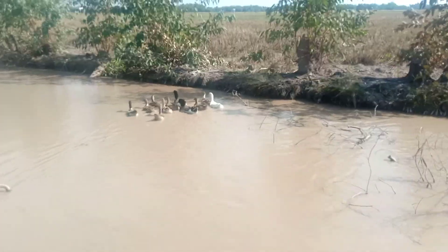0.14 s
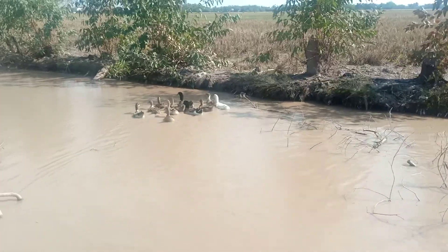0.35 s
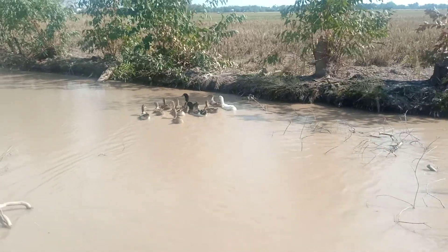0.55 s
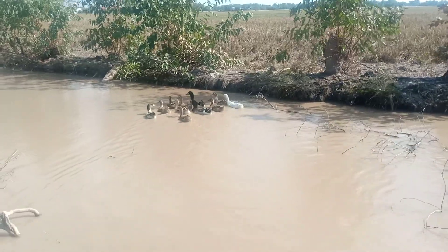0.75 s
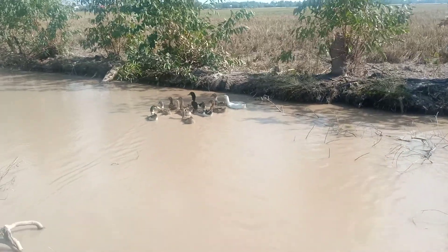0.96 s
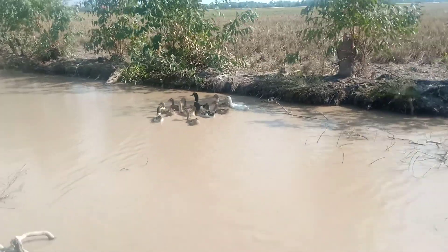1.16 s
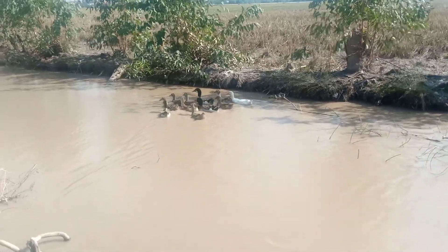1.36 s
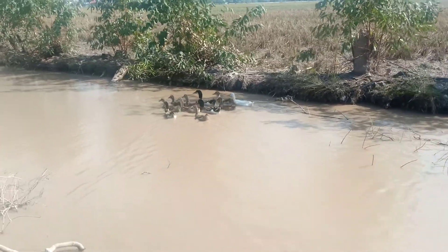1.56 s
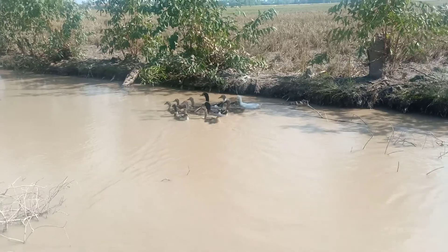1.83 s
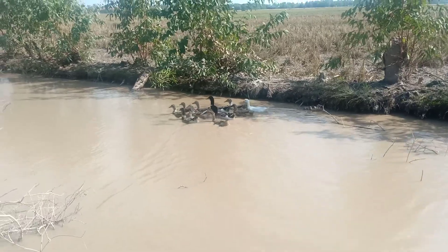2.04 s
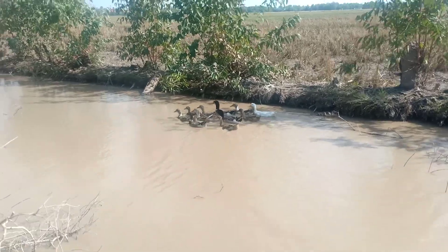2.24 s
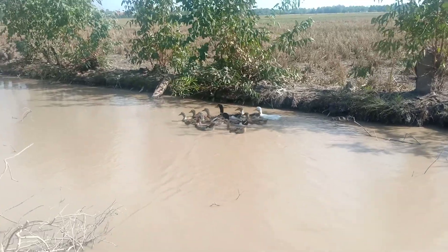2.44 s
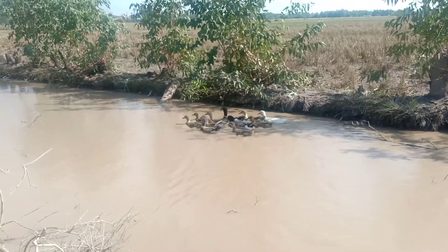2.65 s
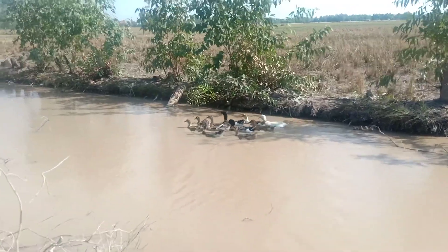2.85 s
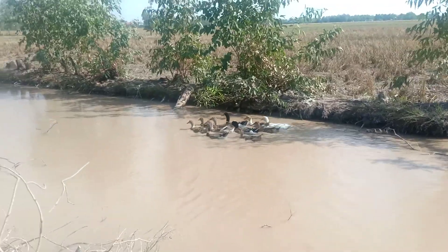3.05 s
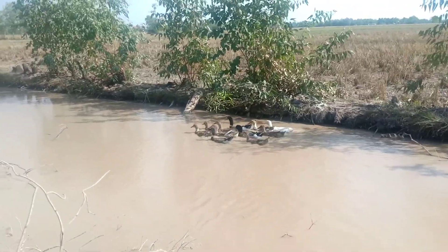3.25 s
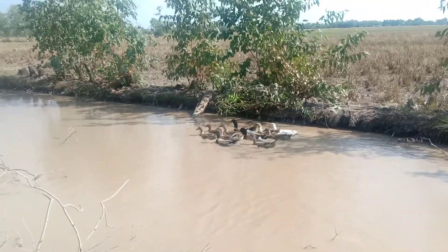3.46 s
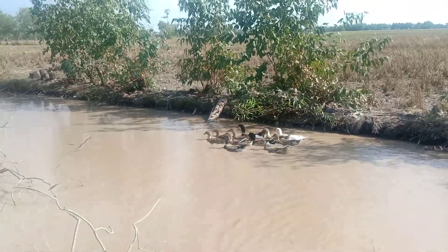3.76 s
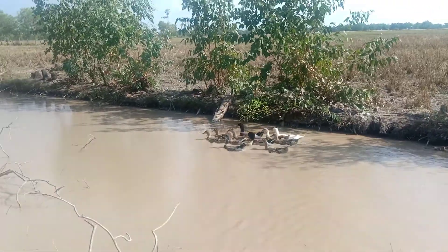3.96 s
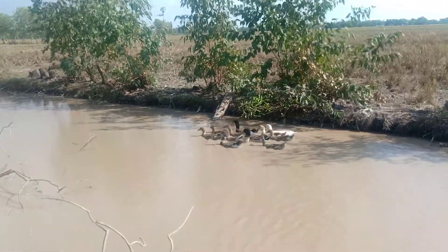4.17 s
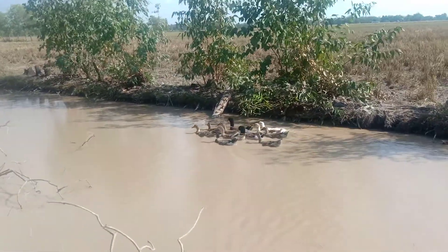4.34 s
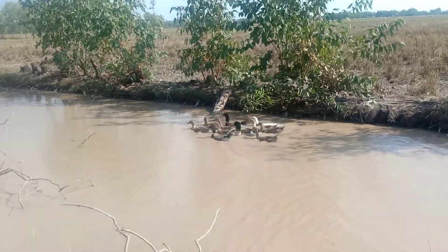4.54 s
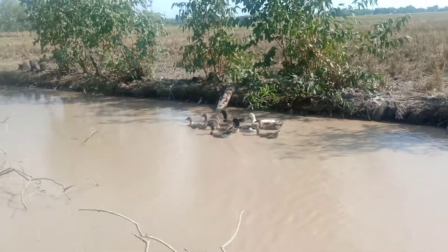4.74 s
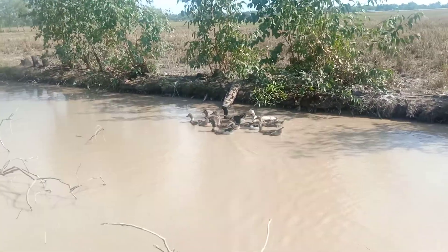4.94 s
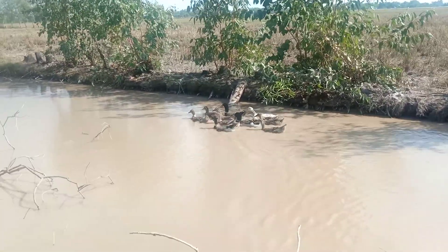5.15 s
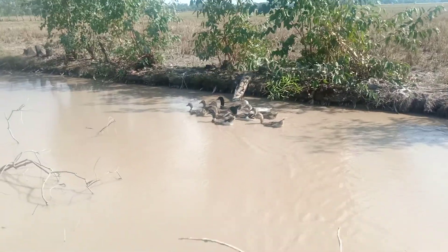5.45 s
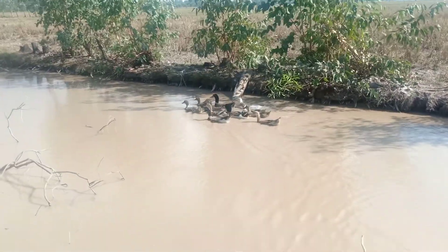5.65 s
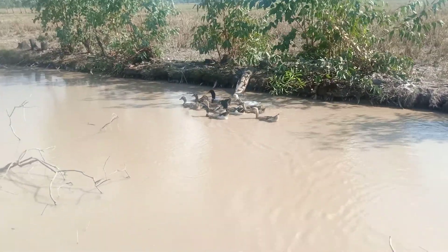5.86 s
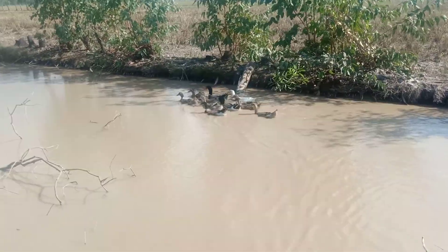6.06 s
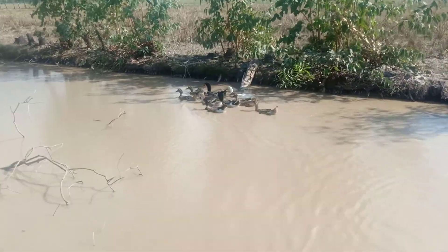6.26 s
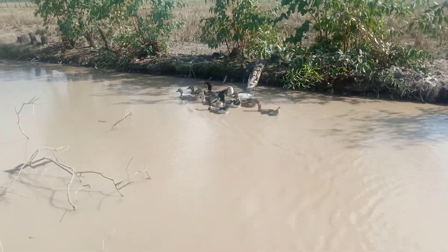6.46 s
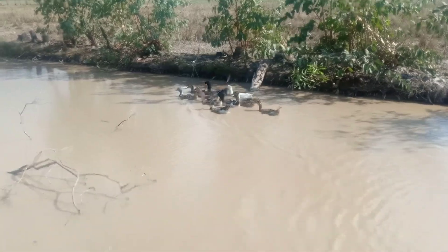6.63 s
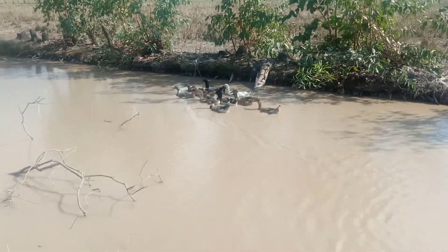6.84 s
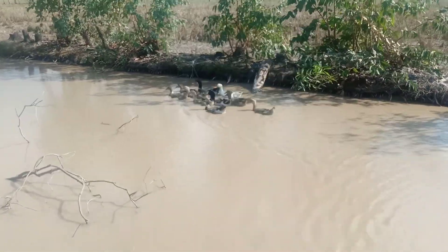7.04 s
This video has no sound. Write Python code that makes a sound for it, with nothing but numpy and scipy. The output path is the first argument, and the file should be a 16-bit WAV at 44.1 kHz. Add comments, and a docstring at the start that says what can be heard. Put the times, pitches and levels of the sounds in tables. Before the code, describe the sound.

Ducks chatter outdoors in short quacks and raspy calls, with a faint songbird and low wind thumps.

```python
"""A canal in open country, where a small flock of ducks chatters some way from a hand-held phone.
Each call is a source and a filter: membranes in the syrinx slap, and the throat and bill resonate.
Drakes rasp in slow noisy pulses, hens cluck in short dark bursts, and far birds fill the gaps.
A songbird trills, the ducks splash, the banks echo and small ticks sound close by. Wind rumbles and
thumps on the two microphone ports, over a faint hum and the hiss of leaves."""
import sys
import numpy as np
from scipy import signal
from scipy.fft import rfft, irfft
from scipy.io import wavfile
from scipy.ndimage import uniform_filter1d, map_coordinates

SR = 44100
rng = np.random.default_rng(int(sys.argv[2]) if len(sys.argv) > 2 else 0)


def persist_wave(psi):
    """Save psi, clipped to +-1, as 16-bit WAV."""
    counts = np.round(np.clip(psi, -1, 1) * 32767).astype(np.int16)
    wavfile.write(sys.argv[1], SR, np.atleast_2d(counts).T)


N = 370440


def flock():
    """Superposition: the calls and splashes of the near birds add, each at its own time."""
    # short rasps, except the row at 4.874 s, a dull burst voiced the same way that sounds with a splash, and
    # the row at 5.779 s, a brief pulse near 2 kHz voiced the same way among a run of slaps: # middle_s,
    # throat_db, length_s, centre_hz, bill_re_throat_db
    quacks = [(.205, -49.5, 0.06, 1880, -15.5), (.446, -50.5, 0.076, 1890, -13),
              (.645, -48, 0.058, 2060, -3), (.715, -49.5, 0.04, 1820, -12.5), (.807, -52, 0.12, 2180, -8.5),
              (.916, -47.5, 0.049, 1860, -11.5), (1.448, -52.5, 0.057, 1570, -19),
              (2.027, -51.5, 0.048, 1780, -17), (2.312, -52.5, 0.039, 1840, -32),
              (3.013, -49, 0.08, 2070, -16.5), (3.139, -52, 0.067, 1730, -12.5),
              (3.697, -54, 0.064, 2070, -10.5), (3.964, -50, 0.077, 2360, -11),
              (4.071, -48, 0.06, 1820, -15), (4.664, -49.5, 0.035, 1940, -11.5),
              (4.874, -48.5, 0.066, 2030, -14), (4.967, -49, 0.072, 1830, -13),
              (5.092, -47, 0.044, 1980, -2.5), (5.293, -50, 0.067, 1880, 1.5),
              (5.568, -50, 0.052, 1830, -4.5), (5.675, -47, 0.062, 1770, -5),
              (5.779, -46.5, 0.034, 1940, -13), (5.87, -44.5, 0.063, 2000, 1.5),
              (6.055, -43.5, 0.065, 1600, -10.5), (6.2, -41, 0.058, 1540, -11.5),
              (6.296, -45, 0.063, 1720, -4), (6.406, -42.5, 0.053, 1920, 3),
              (6.578, -50.5, 0.047, 1830, -10.5), (6.722, -46, 0.08, 1860, -4.5),
              (6.783, -45, 0.043, 1860, -7), (6.935, -42, 0.054, 1940, 1), (7.269, -44, 0.05, 1930, -2.5),
              (7.474, -41, 0.063, 2040, 3.5), (7.577, -51, 0.059, 2440, -9), (7.72, -50.5, 0.056, 1950, -6),
              (7.79, -44.5, 0.059, 1970, 0.5), (7.998, -43, 0.038, 2050, 5),
              (8.199, -44.5, 0.053, 2050, -10), (8.345, -46, 0.051, 2020, -1)]
    # hens' calls: middle_s, level_db, length_s, pulse_hz
    clucks = [(.382, -44.5, 0.054, 226), (.956, -55, 0.041, 148), (1.281, -45.5, 0.055, 196),
              (1.936, -41.5, 0.055, 240), (2.414, -55, 0.05, 130), (2.611, -44.5, 0.028, 153),
              (2.888, -54, 0.016, 130), (3.064, -49.5, 0.037, 132), (3.171, -53, 0.029, 92),
              (3.309, -51, 0.038, 127), (3.595, -52.5, 0.03, 120), (3.748, -50.5, 0.047, 90),
              (3.921, -48, 0.034, 94), (4.038, -48.5, .032, 144), (4.178, -52, 0.031, 118),
              (4.273, -52.5, 0.043, 87), (4.417, -54, 0.075, 140), (4.538, -51.5, 0.048, 105),
              (4.731, -49, 0.063, 103), (4.827, -47.5, 0.032, 125), (4.9675, -46.5, 0.043, 105),
              (5.104, -51, 0.045, 92), (5.418, -51, 0.052, 127), (5.675, -45, 0.045, 112),
              (5.792, -50.5, 0.058, 91), (5.8305, -40, 0.0095, 55), (5.927, -48, 0.055, 109),
              (6.039, -49, 0.032, 156), (6.19, -45, 0.033, 136), (6.313, -43.5, 0.049, 206),
              (6.474, -48, 0.075, 175), (6.556, -53, 0.064, 200), (6.634, -51.5, 0.024, 97),
              (6.959, -42, 0.022, 196), (7.158, -50, 0.044, 138), (7.2335, -44.5, 0.033, 108),
              (7.393, -44.5, 0.026, 136), (7.538, -48, 0.039, 166), (7.679, -44, 0.039, 117),
              (7.861, -48.5, 0.047, 59), (7.996, -51, 0.092, 150), (8.117, -46.5, 0.024, 118),
              (8.342, -46, 0.025, 336)]
    # long rasps: start_s, shuts_s, end_s, throat_db, first_bill_db, widest_bill_db,
    # widest_centre_hz, crest_share, first_pulse_hz, last_pulse_hz
    rasps = [(1.58, 1.9, 1.97, -47, -29, -8, 1650, 0.71, 73, 88),
             (2.45, 2.78, 2.86, -39.5, -25, 2, 1900, 0.37, 87, 108.4),
             (3.31, 3.65, 3.77, -42, -16, 3, 2110, .4, 88, 99),
             (4.24, 4.56, 4.6, -39, -10.5, 10.5, 2540, 0.82, 74.3, 112)]
    # bursts of spray: middle_s, level_db, length_s
    splashes = [(3.875, -44.5, 0.065), (4.89, -43.5, .03)]
    # high call: middle_s, level_db, length_s, pulse_hz, resonance_hz
    yelps = [(6.2198, -36.5, 0.049, 155, 2480)]
    out = np.zeros(N)
    for rows, source in (quacks, quack), (clucks, cluck), (rasps, rasp), (splashes, splash), (yelps, yelp):
        for row in rows:
            add(out, *source(*row))
    return out


def syrinx(pulse_hz, jitter, shimmer_db, puff, puff_s):
    """Pulsed source: membranes slap unevenly, and each slap releases a puff of air noise."""
    wobble, strength, air = rng.standard_normal((len(pulse_hz), 3)).T
    cycles = np.cumsum(pulse_hz * (1 + jitter * unit_rms(uniform_filter1d(wobble, size=300)))) / SR
    cycles -= cycles[len(cycles) // 2]  # one slap falls at the very middle
    onsets = np.diff(np.floor(cycles), append=np.floor(cycles[-1])) > 0
    slaps = onsets * gain_of(shimmer_db * strength)
    pole = np.exp(-1 / (puff_s * SR))
    puffs = air * signal.lfilter([1], np.poly([pole] * 3), slaps)
    return unit_rms(slaps + 1e-9 * air) + puff * unit_rms(puffs + 1e-9 * air)


def drake(throat_db, bill_db, centre_hz, pulse_hz, tuning):
    """Source and filter: throat modes near the centre ring most; an open bill adds air and hiss."""
    # throat modes, bill shut and open: shut_hz, open_hz, width_hz, shut_db, open_db
    throat_modes = [(1290, 1410, 110, -4, -2), (1630, 1630, 90, 0, 1.5), (1960, 1960, 80, 0, -7),
                    (2400, 2230, 100, -1, -3.5), (2700, 2740, 170, -9, -2), (2980, 3000, 170, -12, -2)]
    # bill modes: pitch_hz, width_hz, level_db
    bill_modes = [(3560, 150, -8), (4170, 280, -2), (4660, 300, 0), (5000, 240, 5), (5420, 300, -7),
                  (5950, 250, -10)]
    count, wander_db, wander_share = len(pulse_hz), 2.2, .01
    opening = 1 / (0.5 + np.exp(-(bill_db + 15) / 2.9))  # 0 shut, 2 wide open
    air = np.array([.6 + .5 * opening, 1.2 + .9 * opening])  # the bill gets more than the throat
    drive, breathy = syrinx(pulse_hz, jitter=.03, shimmer_db=2.2, puff=air, puff_s=.001)
    weights, modes = [], []
    for shut_hz, open_hz, width_hz, shut_db, open_db in throat_modes:
        hz = tuning * (shut_hz + (open_hz - shut_hz) * opening / 2)
        db = shut_db + (open_db - shut_db) * opening + wander_db * wander(count)
        nearness = np.exp(-.5 * ((centre_hz - hz) / 420) ** 2) + 0.17
        weights.append(gain_of(db) * nearness)
        modes.append(ring(drive, hz, width_hz))
    throat = np.sum(np.multiply(weights, modes), axis=0) / np.linalg.norm(weights, axis=0)
    bill_tuning = rng.uniform(.985, 1.01) * tuning ** 0.12  # bills differ, and partly follow the throat
    bill = np.zeros(count)
    for hz, width_hz, db in bill_modes:
        gain = gain_of(db + wander_db * wander(count))
        bill += gain * ring(breathy, hz * bill_tuning * (1 + wander_share * wander(count)), width_hz)
    return gain_of(throat_db) * (throat + gain_of(bill_db) * unit_rms(bill))


def rasp(start_s, shuts_s, end_s, level_db, first_db, widest_db, widest_hz, crest, first_hz, last_hz):
    """Time-varying filter: the bill opens, the throat brightens and weakens, then the bill snaps shut."""
    attack_s, release_s, snap_s = 0.067, 0.1, 0.012
    shut_hz, shut_db, hollow_db, edge_db = 1620, -19, -7, -9.5
    t = np.arange(start_s, end_s, 1 / SR)
    progress = np.clip((t - start_s) / (shuts_s - start_s), 0, 1)
    opened = progress ** 0.6  # the bill opens ever more slowly
    shut = np.clip((t - shuts_s) / snap_s, 0, 1)
    gape = opened * (1 - shut)
    bill_db = (first_db + (widest_db - first_db) * opened) * (1 - shut) + shut_db * shut
    edge = np.clip(np.maximum(1 - (t - start_s) / attack_s, 1 - (end_s - t) / release_s), 0, 1)
    throat_db = level_db + hollow_db * gape + edge_db * edge
    # the throat's pitch rises and sinks with the neck, peaking at the share `crest` of the call
    skewed = ((t - start_s) / (end_s - start_s)) ** (np.log(.5) / np.log(crest))
    tuning = 0.89 + 0.11 * np.sqrt(np.abs(np.sin(np.pi * skewed)))
    pulse_hz = first_hz + (last_hz - first_hz) * progress
    call = drake(throat_db, bill_db, shut_hz + (widest_hz - shut_hz) * gape, pulse_hz, tuning)
    return start_s, call * signal.windows.tukey(len(t), .06)


def quack(middle_s, level_db, length_s, centre_hz, bill_db, tuning=None):
    """Formant glide: a short rasp climbs in and sags after; harder ones pulse faster and start dark."""
    # the calls pass to a bird with a lower throat: time_s, pitch_ratio
    throat_tuning = [(0, 0.96), (5.5, 0.95), (5.85, 0.92), (6.45, 0.93), (6.75, 0.92), (7.3, 0.95),
                     (8.4, 0.91)]
    tuning = tuning or np.interp(middle_s, *np.transpose(throat_tuning))
    climb, sag = .009, .004
    shape_db = swell(length_s, skirt=1.1)
    effort = np.clip((bill_db + 13) / 12, 0, 1)
    rising = np.arange(len(shape_db)) < len(shape_db) / 2
    below_db = np.maximum(shape_db, -16)
    bend = np.where(rising, climb, sag) * (0.11 + effort) * below_db
    lead = .7 * effort * rising  # in hard calls the throat sounds ahead of the bill
    darkening_hz = 50 * effort * rising * below_db
    pulse_hz = np.full_like(shape_db, 69 + 18 * effort)
    call = drake(level_db + (1 - lead) * shape_db, bill_db + (0.35 + lead) * shape_db,
                 centre_hz + darkening_hz, pulse_hz, tuning + bend)
    return centred(middle_s, call)


def cluck(middle_s, level_db, length_s, pulse_hz):
    """Impulse excitation: a few slaps ring a hen's dark throat, each with a bright edge."""
    # the timbre drifts as the hens mill about: time_s, formant_hz, upper_lift_db, edge_db
    colour = [(.4, 710, 12, -17), (1.95, 750, 14.5, -22), (2.6, 770, 10.5, -15), (4.1, 820, -4, -16.5),
              (4.95, 780, -4, -10), (5.4, 780, 3, -9.5), (5.8, 855, 9.5, -12.5), (6.3, 910, 9, -12),
              (7.4, 825, 9.5, -15), (8.1, 815, 9.5, -8.5), (8.35, 860, 5, -10)]
    # throat modes: formant_ratio, nominal_width_hz, level_db
    throat_modes = [(0.3, 172, 6), (0.602, 183, 11), (1.018, 133, 12.5), (1.55, 111, 2.5),
                    (2.03, 150, -2.5)]
    times_s, *columns = np.transpose(colour)
    formant_hz, lift_db, edge_db = (np.interp(middle_s, times_s, column) for column in columns)
    formant_hz *= rng.uniform(.92, 1.08)  # no two hens alike
    shape_db = 2.1 * swell(length_s, skirt=.9, steep=5.4)
    hoarseness = 1500 * length_s / pulse_hz  # long slow clucks carry more air
    slaps = syrinx(np.full_like(shape_db, pulse_hz), .06, shimmer_db=2.2, puff=hoarseness, puff_s=.0007)
    drive = gain_of(shape_db) * slaps
    throat = sum(gain_of(db + lift_db * (ratio > 1.2)) * ring(drive, ratio * formant_hz, 1.32 * width)
                 for ratio, width, db in throat_modes)
    throat = signal.sosfilt(signal.butter(2, 2.6 * formant_hz, fs=SR, output="sos"), unit_rms(throat))
    edge = ring(drive, 2540, 470) + ring(drive, 3840, 480) + 0.88 * ring(drive, 4930, 1000)
    return centred(middle_s, gain_of(level_db) * (throat + gain_of(edge_db) * edge))


def yelp(middle_s, level_db, length_s, pulse_hz, resonance_hz):
    """Single formant: quick clean slaps ring one high resonance."""
    shape_db = swell(length_s, skirt=0.61, steep=1.4)
    drive = syrinx(np.full_like(shape_db, pulse_hz), jitter=.05, shimmer_db=2, puff=.4, puff_s=.001)
    return centred(middle_s, gain_of(level_db + shape_db) * ring(drive, resonance_hz, 700))


def splash(middle_s, level_db, length_s):
    """Amplitude-modulated noise: drops make a burst of spray gritty, strongest in the upper middle."""
    shape_db = swell(length_s, skirt=0.99, steep=0.76)
    air, drops = rng.standard_normal((len(shape_db), 2)).T
    spray = air * gain_of(5.2 * unit_rms(uniform_filter1d(drops, size=60)))
    return centred(middle_s, gain_of(level_db + shape_db) * ring(spray, 2270, 2250))


def songbird_and_bubble():
    """Frequency sweeps: a trill of falling notes, a few chirps, and one bubble that rises in pitch."""
    # loudness of the trill: time_s, level_db
    trill = [(1.1, -85), (1.7, -58), (2, -54), (2.5, -55)]
    # two chirps, an arched chirp in two slides, then one rising bubble in two slides:
    # start_s, level_db, from_hz, to_hz, length_s
    slides = [(0.591, -49, 4800, 5760, 0.041), (0.638, -47.5, 5660, 4600, 0.03),
              (3.262, -50, 3680, 4500, 0.013), (3.272, -52, 4500, 3700, 0.013),
              (5.464, -38, 777, 980, 0.023), (5.488, -45.5, 1030, 1320, 0.025)]
    out = np.zeros(N)
    for start_s in np.arange(1.128, 2.48, .0656):
        level_db = np.interp(start_s, *np.transpose(trill))
        add(out, start_s, gain_of(level_db) * glide(2500, 2280, 0.04, rise=0.56))
    for start_s, level_db, *sweep in slides:
        add(out, start_s, gain_of(level_db) * glide(*sweep, rise=0.33))
    return out


def far_birds():
    """Incoherent sum: eighty short rasps at random times merge into a murmur."""
    # loudness of the murmur: time_s, level_db
    murmur = [(0, -58), (.9, -58), (2, -97), (4, -53), (5.3, -58.5), (8.4, -61.5)]
    out = np.zeros(N)
    for when, faintness, length, tone, build in rng.random((80, 5)):
        add(out, *quack(when * N / SR, level_db=-4 * faintness, length_s=.035 + .03 * length,
                        centre_hz=1300 + 1300 * tone, bill_db=-24 + 10 * tone, tuning=0.9 + 0.302 * build))
    return gain_of(along(murmur)) * unit_rms(out)


def ticks():
    """Broadband transients: a brief burst of noise rings a bright snap and a duller knock."""
    # clicks near the microphones: start_s, snap_db
    clicks = [(.309, -54), (0.71, -57), (0.7233, -50), (1.171, -53.5), (4.795, -64), (4.839, -55.5),
              (4.941, -52), (5.039, -66), (5.128, -63), (5.236, -58), (5.621, -64), (6.159, -66),
              (6.202, -54), (7.2668, -53), (8.313, -57.5)]
    knock_db = 9
    out, t = np.zeros((2, N)), np.arange(400) / SR
    for start_s, snap_db in clicks:
        for channel in out:
            grit = rng.standard_normal(len(t)) * t * np.exp(-t / 0.00091)
            click = ring(grit, 23000, 7100) + gain_of(knock_db) * ring(grit, 2770, 2330)
            add(channel, start_s, gain_of(snap_db) * click)
    return out


def wind():
    """Turbulent pressure on the ports: a lumpy rumble that follows the gusts, and low thumps."""
    # strength of the gusts: time_s, level_db
    gusts = [(0, -51.5), (.5, -57.5), (5.5, -48.5), (5.75, -41.5), (6.2, -49), (7.7, -49), (8.2, -47.5)]
    # spectrum of the rumble: frequency_hz, relative_db
    spectrum = [(20, -66), (48, -2), (100, 1.5), (180, -7.5), (300, -23), (600, -26), (1200, -79)]
    # buffets of air: time_s, level_db
    thumps = [(0.446, -50.5), (3.574, -52), (5.689, -41), (5.724, -42.5), (6.958, -49), (7.098, -37),
              (7.383, -46.5), (7.983, -40.5), (8.229, -45), (8.29, -42.5)]
    out = gain_of(along(gusts)) * noise(spectrum, coherence=.4, patchy_db=2.2, frame=1024)
    t = np.arange(round(.1 * SR)) / SR
    for time_s, level_db in thumps:
        pitch_hz = 265 + 3.5 * level_db  # harder thumps sound higher
        for channel in out:
            puff = rng.standard_normal(len(t)) * t * np.exp(-t / 0.012)
            add(channel, time_s - .01, gain_of(level_db) * ring(puff, pitch_hz, 136))
    return out


def hum():
    """Slow random modulation: two low tones from afar waver together in pitch and level."""
    # partials of the hum: pitch_hz, rms_db
    partials = [(59.3, -59), (118.5, -61)]
    drift = unit_rms(uniform_filter1d(rng.standard_normal(N), size=9000))
    warped_s = np.cumsum(1 + 0.01054 * drift) / SR
    waver = uniform_filter1d(rng.standard_normal(N), size=4000)
    waver_db = 2.5 * unit_rms(uniform_filter1d(waver, size=4000))
    return np.sqrt(2) * sum(gain_of(db + waver_db) * np.sin(2 * np.pi * hz * warped_s)
                            for hz, db in partials)


def countryside():
    """Ambient noise: a steady wash, and a faint hiss of leaves that swells into short rustles."""
    # spectrum of the open country: frequency_hz, relative_db
    wash_spectrum = [(120, -36), (200, 4), (346, -4), (644, 2), (1000, -1.5), (1500, -8), (1950, -8),
                     (2400, -5), (2850, -6), (3390, -23), (5160, -13), (7580, -34), (13600, -33.5),
                     (15700, -62)]
    # spectrum of the leaves: frequency_hz, relative_db
    leaf_spectrum = [(4000, 5), (7000, -10), (9500, -22), (11500, -14.5), (13800, -12.5), (15800, -13)]
    # rustles of leaves and splashes: middle_s, level_db
    rustles = [(.03, -56), (3.88, -57), (4.87, -48), (5.79, -57.5), (6.3, -52), (7.1, -52.5), (7.58, -54),
               (7.88, -58), (8.28, -47.5)]
    wash = gain_of(-55.5) * noise(wash_spectrum, coherence=0.51, patchy_db=2.6, frame=512)
    t = np.arange(N) / SR
    crackle = gain_of(4.5 * unit_rms(uniform_filter1d(rng.standard_normal(N), size=80)) - 3)
    swells = sum(gain_of(db - 6.1 * ((t - middle_s) / 0.044) ** 2) for middle_s, db in rustles)
    leaves = noise(leaf_spectrum, coherence=0.024, patchy_db=4.5, frame=256)
    return wash + (gain_of(-62.5) + crackle * swells) * leaves


def ports(x):
    """Time and level differences: sound reaches one port first, and the phone's body shades one."""
    # delay of the left port as the phone turns: time_s, lag_samples
    lag = [(0, -1.5), (1.2, -3), (1.6, 1.5), (4, 2), (6.5, 3), (8.4, 1.5)]
    # acoustic shadow: frequency_hz, left_over_right_db
    shadow = [(300, 0.5), (800, -1), (1500, 0.2), (2400, 5.5), (4400, 5.5), (9000, 2)]
    left = map_coordinates(x, [np.arange(N) - along(lag)], order=3)
    half_db = spectrum_at(shadow, np.fft.rfftfreq(N, 1 / SR)) / 2
    return irfft(rfft([left, x]) * gain_of([half_db, -half_db]), N)


def banks(x):
    """Reverberation: sparse echoes off the water, the bank and the trees decay exponentially."""
    rt60_s = 0.1
    t = np.arange(round(.3 * SR)) / SR
    signs = rng.choice([-1., 1.], (2, len(t)))
    arrivals = (rng.random((2, len(t))) < .04) * (t > .002)
    echoes = signs * arrivals * gain_of(-60 * t / rt60_s)
    return signal.oaconvolve(x[None], echoes / np.linalg.norm(echoes[0]), axes=1)[:, :N]


def ring(x, hz, width_hz):
    """Resonance by heterodyning: shift a fixed or moving pitch to zero, smooth, shift back; rms 1."""
    carrier = np.exp(2j * np.pi * np.cumsum(hz * np.ones(len(x))) / SR)
    pole = np.exp(-np.pi * width_hz * np.sqrt(2) / SR)
    return unit_rms((carrier * signal.lfilter([1], np.poly([pole, pole]), x / carrier)).real)


def noise(spectrum, coherence, patchy_db, frame):
    """Spectral shaping: two partly coherent channels of coloured noise with drifting patches; rms 1."""
    frames, hz = 4 * N // frame + 5, np.fft.rfftfreq(frame, 1 / SR)
    real, imag, other_real, other_imag, patches = rng.standard_normal((frames, len(hz), 5)).T
    patches = unit_rms(uniform_filter1d(uniform_filter1d(patches, size=8, axis=0), size=10, axis=1))
    left = real + 1j * imag
    right = coherence * left + np.sqrt(1 - coherence ** 2) * (other_real + 1j * other_imag)
    bins = np.array([left, right]) * gain_of(spectrum_at(spectrum, hz)[:, None] + patchy_db * patches)
    return unit_rms(signal.istft(bins, nperseg=frame, noverlap=frame * 3 // 4)[1][:, :N])


def glide(from_hz, to_hz, length_s, rise):
    """Linear chirp: a short sliding tone; a smaller rise sharpens its attack."""
    progress = np.arange(0, 1, 1 / (length_s * SR))
    hz = from_hz + (to_hz - from_hz) * progress
    return np.sin(2 * np.pi * np.cumsum(hz) / SR) * np.sin(np.pi * progress ** rise) ** 2


def wander(count):
    """Modulation by the moving head and bill: three random sines of 2 to 11 Hz, rms about 1."""
    speed, phase = rng.random((3, 2)).T
    cycles = (2 + 9 * speed) * np.arange(count)[:, None] / SR + phase
    return .8 * np.sin(2 * np.pi * cycles).sum(axis=1)


def swell(length_s, skirt, steep=2.03):
    """Envelope in dB, 6 down at either end of the length and reaching skirt lengths each way."""
    t = np.arange(-skirt * length_s, skirt * length_s, 1 / SR)
    return -6 * np.abs(2 * t / length_s) ** steep


def gain_of(db):
    """Decibels to amplitude ratio."""
    return 10 ** (np.asarray(db) / 20)


def unit_rms(x):
    """Normalisation to rms 1."""
    return x / np.sqrt(np.mean(x ** 2) + 1e-20)


def spectrum_at(points, hz):
    """Interpolation of a spectrum on a log-frequency axis."""
    points_hz, db = np.transpose(points)
    return np.interp(np.log(hz + 1), np.log(points_hz + 1), db)


def along(curve):
    """Interpolation of a time curve at every sample."""
    return np.interp(np.arange(N) / SR, *np.transpose(curve))


def centred(middle_s, sound):
    """The start time that centres a sound on middle_s, and the sound."""
    return middle_s - len(sound) / SR / 2, sound


def add(mix, start_s, sound):
    """Superposition of a sound on the mix."""
    part = mix[max(round(start_s * SR), 0):][:len(sound)]
    part += sound[:len(part)]


def scene():
    """Direct and reflected sound sum at the two ports; the far birds come mostly as echo."""
    over_water = signal.butter(8, 5800, fs=SR, output="sos")  # little treble carries across
    near, far = signal.sosfilt(over_water, [flock() + songbird_and_bubble(), far_birds()])
    direct = ports(near + 0.19 * far)
    echoes = banks(gain_of(-8.0) * near + far)
    return direct + echoes + ticks() + wind() + hum() + countryside()


def record(dry):
    """Band limiting: the microphones cut the bass and the top treble, and add a small steady offset."""
    cut = signal.sosfilt(signal.butter(4, 42, "high", fs=SR, output="sos"), dry)
    low_pass = signal.firwin(511, 15750, window=("kaiser", 9), fs=SR)
    return signal.oaconvolve(cut, low_pass[None], "same") + 0.00087


dry = scene()
out = record(dry)
persist_wave(out)
```